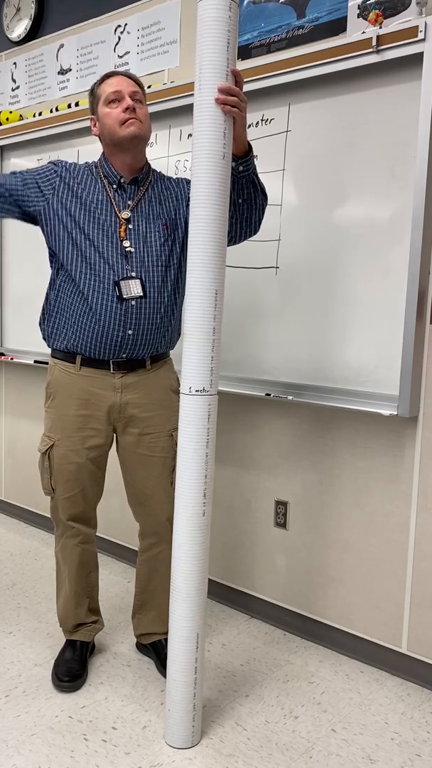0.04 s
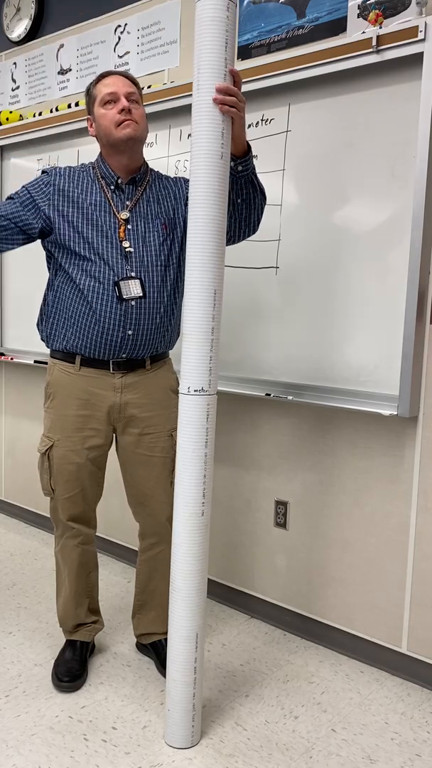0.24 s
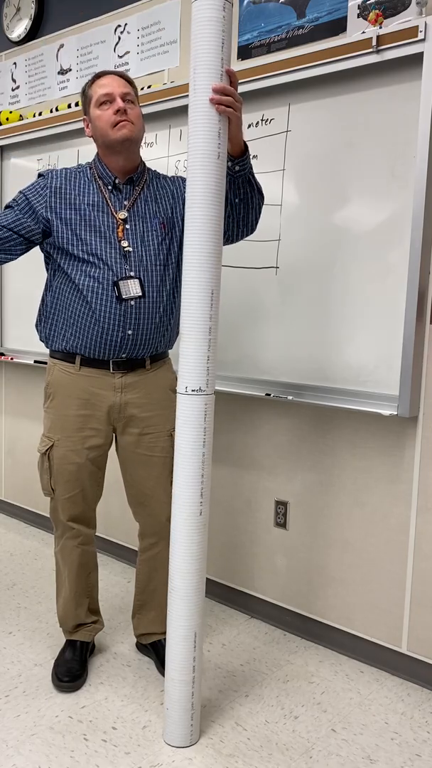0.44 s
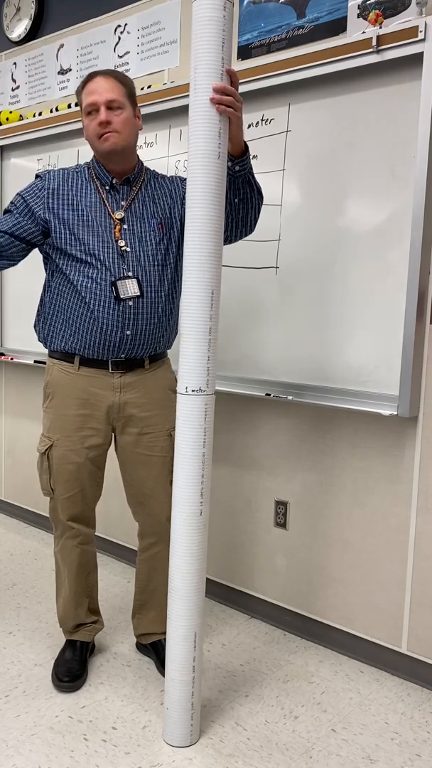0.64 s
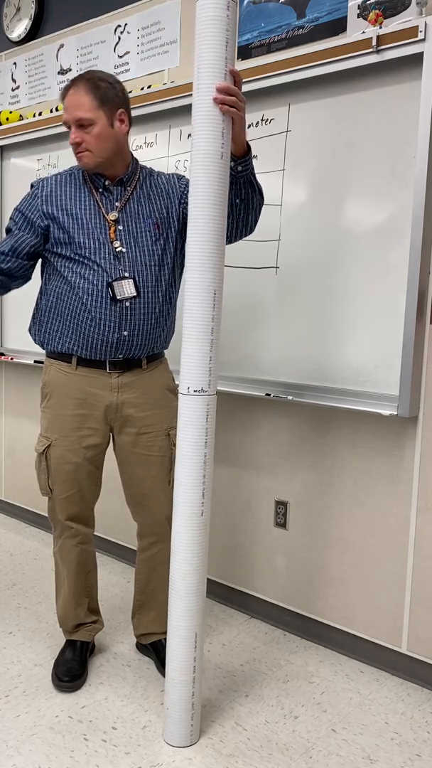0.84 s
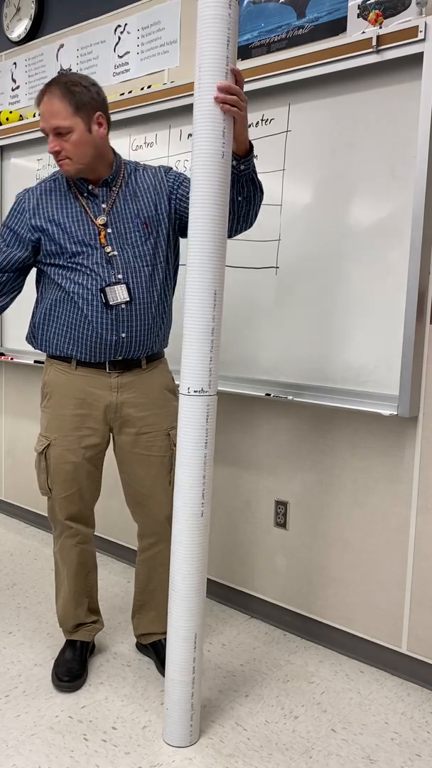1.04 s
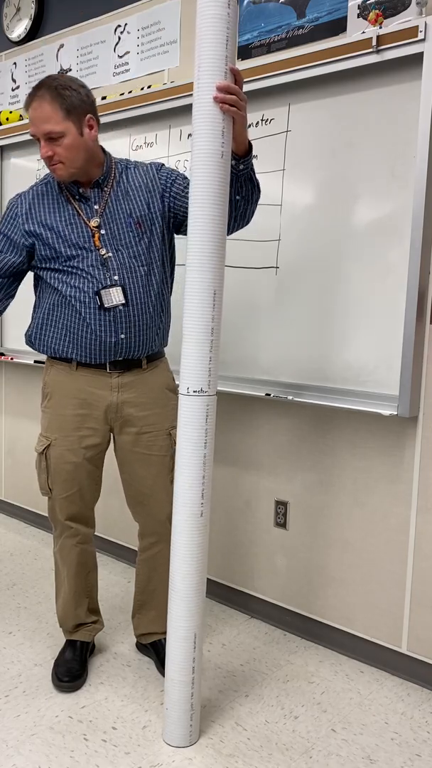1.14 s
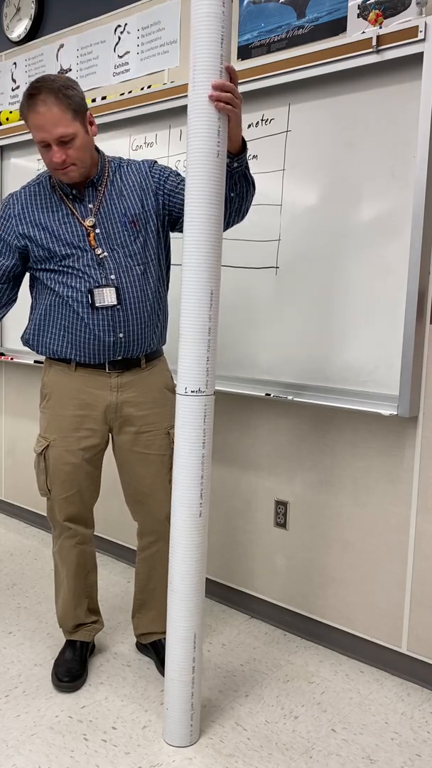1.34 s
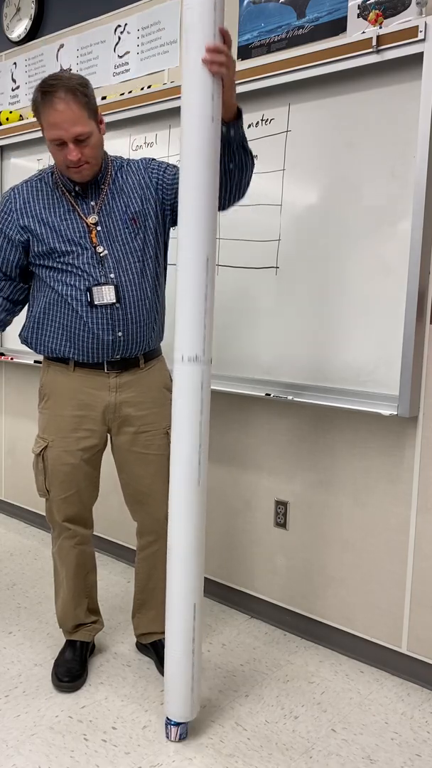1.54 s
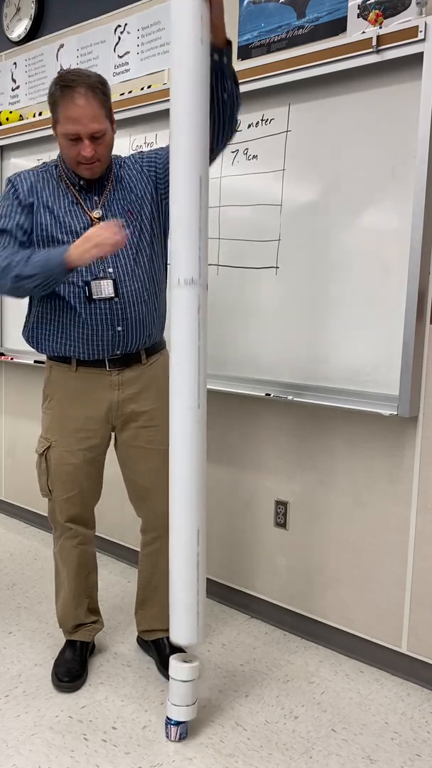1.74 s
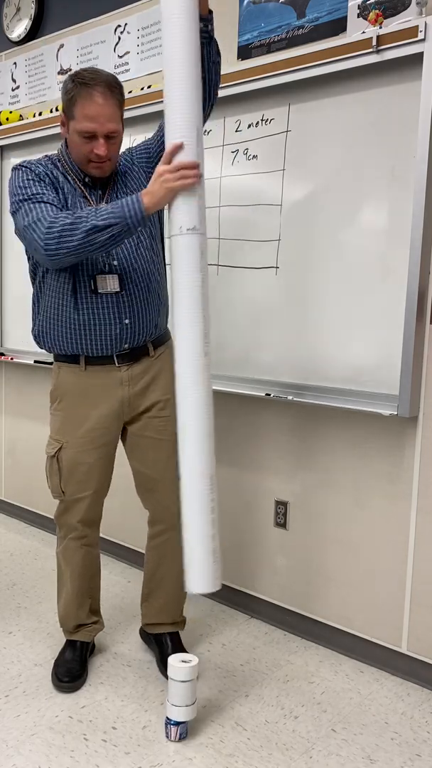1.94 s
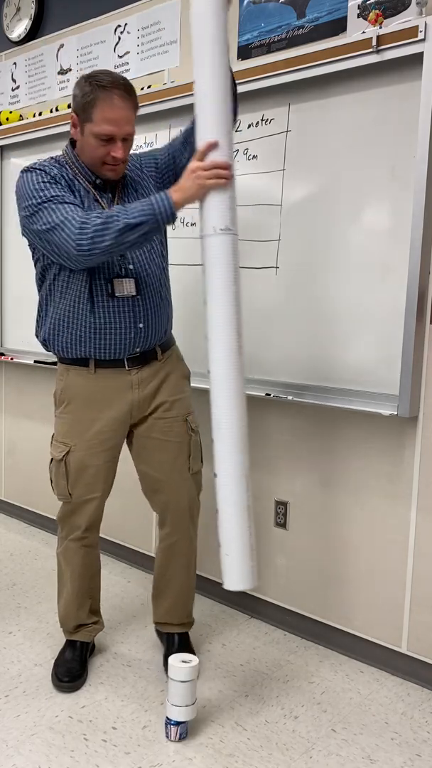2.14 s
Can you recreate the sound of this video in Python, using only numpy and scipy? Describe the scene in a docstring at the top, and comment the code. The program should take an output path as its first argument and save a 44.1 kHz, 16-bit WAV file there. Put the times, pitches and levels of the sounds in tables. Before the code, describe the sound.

A weight scrapes down a pipe and crushes a can, followed by clinks and soft knocks.

```python
"""A weight scrapes and bumps down an upright plastic pipe, exciting the wall's resonances. It slams onto
an aluminium can on a hard classroom floor: a crack, a crunch, a thud; a low room tail swells and fades.
Later a steel part clinks and rattles, the pipe is knocked and hums as it is lifted, and hands and
sleeves brush it. All along, ventilation hums in the lively room; a phone's two microphone ports hear it."""
import sys
import numpy as np
from scipy import signal
from scipy.fft import rfft, irfft, next_fast_len
from scipy.io import wavfile

SR = 44100
rng = np.random.default_rng(int(sys.argv[2]) if len(sys.argv) > 2 else 0)


def materialize(psi):
    """Save the field psi as 16-bit PCM at rate SR to the path in sys.argv[1].

    A 1-D psi becomes a single channel; in a 2-D psi each row is a channel.
    """
    bounded = np.clip(np.atleast_2d(psi).T, -1, 1)
    quanta = np.round(bounded * 32767).astype(np.int16)
    wavfile.write(sys.argv[1], SR, quanta)


N = 97020
T = np.arange(N) / SR


def sliding_weight():
    """Grains of contact drive two sets of pipe resonances; the scrape's tone shifts back and forth."""
    # The scrape. Each row: time in seconds, level in dB, blend from 0 (first set) to 1 (second set).
    slide = [(0, -54, 0.29), (.03, -56.5, 0.56), (.045, -43.5, 0), (.07, -44, 0.28), (.105, -56.5, 0.71),
             (.125, -40.5, 1), (.162, -61, 0.75), (.18, -33, 0), (.27, -33.5, 0.08), (.31, -33, 0.84),
             (.4, -31, 0.91), (.411, -19.5, 0.97), (.417, -69, 0.55)]
    # The weight bumping the wall. Each row: start in seconds, strength in dB.
    bump_hits = [(0.034, -37.5), (0.052, -39.5), (0.113, -33.5), (0.167, -29), (.2, -27.5), (0.23, -31.5),
                 (0.258, -30.5), (0.284, -31.5), (0.31, -32.5), (0.317, -20.5), (0.345, -29),
                 (0.364, -30.5), (0.374, -23)]
    # First set of wall resonances. Each row: pitch in Hz, width in Hz, relative level in dB.
    first_modes = [(377, 49, 0.5), (483, 76, -2.5), (825, 41, -11), (1301, 83, -11.5), (1615, 98, -10),
                   (2085, 62, -15), (2465, 40, -24), (3080, 100, -23.5)]
    # Second set of wall resonances. Each row: pitch in Hz, width in Hz, relative level in dB.
    second_modes = [(378, 240, -11), (588.5, 79, 4), (666, 99, 0), (1016, 84, 1), (1197, 68, 1.5),
                    (1990, 125, -4.5), (2210, 78, -19), (2946, 70, -11.5)]
    # The hiss of rubbing. Each row: frequency in Hz, relative level in dB.
    hiss_colour = [(100, -18.5), (400, -3.5), (1500, -6.5), (3000, -13.5), (3800, -16), (4400, -13.5),
                   (5200, -18), (8000, -28), (12000, -27.5), (15500, -29.5)]
    grains_per_s, grain_spread_db, rattle_db = 2500, 4, 4.5
    slide_db, blend = curves(slide)
    scrape = amp(slide_db + rattle_db * wobble(110))  # the contact catches and lets go
    bumps = sum(amp(db) * fading(start, 0.0004, t60=0.0063) for start, db in bump_hits)
    grains = (rng.random(N) < grains_per_s / SR) * rng.standard_normal(N)
    grains *= amp(grain_spread_db * rng.standard_normal(N))

    def pipe_wall(share, modes):
        def response(f):
            return sum((-1) ** k * amp(db) * 1j * f * width / (hz * hz - f * f + 1j * f * width)
                       for k, (hz, width, db) in enumerate(modes))
        force = np.sqrt(share) * (scrape + bumps) * grains
        return filtered(force, response) / np.std(filtered(grains, response))

    blend = np.clip(blend, 0, 1)
    hiss = amp(-3) * (scrape + .3 * bumps) * coloured(hiss_colour)
    return pipe_wall(1 - blend, first_modes) + pipe_wall(blend, second_modes) + hiss


def can_slam():
    """The can cracks and folds, pipe and floor take the blow, and a low room tail swells and fades."""
    # The can's crack. Each row: frequency in Hz, relative level in dB.
    crack_colour = [(100, -27), (1000, -4.5), (1700, 11), (3000, -8.5), (4500, 0), (8000, -6), (11500, -6),
                    (15500, -16)]
    # The can folding. Each row: frequency in Hz, relative level in dB.
    crunch_colour = [(150, -3.5), (500, -7.5), (900, 3.5), (1800, -7.5), (3000, -1.5), (4000, -15),
                     (8000, -10.5), (11500, -13), (15500, -16.5)]
    # The thud of pipe, can and floor. Each row: pitch in Hz, level in dB, t60 in seconds.
    thud_modes = [(77, -15, 0.04), (349.5, -8.5, 0.015), (349, -15.5, 0.064), (461, -17, 0.068),
                  (499, -10, 0.054), (584, -4.5, 0.043), (1065, -15.5, 0.052)]
    # The slam's low room tail, drawn to swell back as the phone's gain recovers, then fade.
    # Each row: time in seconds, level in dB.
    tail_swell = [(.54, -86), (.568, -36.5), (.62, -36), (.665, -34.5), (.72, -41), (.775, -45), (.8, -53),
                  (.9, -69.5)]
    # The room tail's tone. Each row: frequency in Hz, relative level in dB.
    tail_colour = [(40, -32.5), (130, -2.5), (310, 0), (580, 1.5), (800, -12), (1700, -22.5), (3000, -26),
                   (6000, -37), (15000, -89)]
    slam_s, thud_delay_s = .4172, 0.00247
    crack = amp(-5.5) * fading(slam_s, 0.00059, t60=0.015) * coloured(crack_colour)
    crunch = amp(-17.5 + 4.2 * wobble(300)) * fading(slam_s, 0.00052, t60=0.12) * coloured(crunch_colour)
    room_tail = amp(curves(tail_swell)[0] + 3.1 * wobble(60)) * coloured(tail_colour)
    return crack + crunch + room_tail + ring(slam_s + thud_delay_s, thud_modes, flutter=0)


def steel_clinks():
    """A steel part is struck and rattles, each hit a bright ring with a noisy edge."""
    # The hits. Each row: start in seconds, relative level in dB.
    hits = [(1.196, -24), (1.24, -40), (1.2625, -31.5), (1.3, -42.5), (1.324, -40.5), (1.372, -59.5),
            (1.43, -65)]
    # The steel's partials. Each row: pitch in Hz, relative level in dB, t60 in seconds.
    steel_modes = [(2210, -7.5, 0.14), (2540, -4, 0.084), (3176, -2, 0.16), (3240, -4.5, 0.36),
                   (3380, -2.5, 0.091), (4600, -11.5, 0.19), (4933, -2.5, 0.14), (5006, 5, 0.082),
                   (5540, -10.5, 0.077), (5840, -8, 0.14), (7120, -7, 0.13), (9250, -12.5, 0.16),
                   (11570, -14, 0.085), (14150, -19, .04)]
    # The edge of a hit. Each row: frequency in Hz, relative level in dB.
    edge_colour = [(500, -10), (2500, -3.5), (3900, -2), (5500, -1), (10000, -14), (15000, -54)]
    out = np.zeros(N)
    for start, db in hits:
        tone = ring(start, steel_modes, flutter=1.6)
        edge = amp(6) * fading(start, 0.00099, t60=0.034) * coloured(edge_colour)
        out += amp(db - 6.5) * (tone + edge)
    return out


def pipe_hums():
    """Soft knocks set the pipe humming, each a low tone with a weaker ring that is held longer."""
    # The knocks. Each row: start in seconds, pitch in Hz, level in dB, hold and t60 in seconds.
    knocks = [(-.01, 351.5, -39, 0.0099, 0.34), (0.119, 347, -34.5, 0.021, 0.089),
              (0.116, 618, -34.5, 0.01, 0.079), (0.122, 997, -47, 0.013, 0.05),
              (.198, 362.7, -22, 0.012, 0.027), (.216, 360, -21, 0.0042, 0.036),
              (.228, 366, -29, 0.0076, .04), (.3445, 655, -17.5, 0.0029, 0.012),
              (.354, 600, -20, 0.0011, 0.02), (1.201, 260.5, -37.5, 0.0087, 0.027),
              (1.237, 167, -38, 0.017, 0.089), (1.295, 168.6, -41, 0.0088, 0.14),
              (1.494, 432.7, -39.5, 0.02, 0.1), (1.51, 188.7, -52.5, 0.09, 0.24),
              (1.53, 135.4, -50, 0.086, .2), (1.632, 357, -41, 0.008, 0.13),
              (1.964, 330.7, -49, 0.019, .15), (1.71, 149, -47, 0.018, 0.056),
              (1.737, 356, -32.5, 0.038, 0.086)]
    attack_s = 0.0015
    out = np.zeros(N)
    for start, hz, db, hold, t60 in knocks:
        body = fading(start, attack_s, t60, hold)
        tail = amp(-11) * fading(start, attack_s, t60=4 * hold, hold_s=3.3 * hold)
        out += amp(db) * np.maximum(body, tail) * np.sin(2 * np.pi * hz * (T - start))
    return out


def pipe_brushes():
    """Rubs and taps on the pipe, each a burst of grainy noise with its own colour."""
    # The touches. Each row: start in seconds, level in dB, attack and t60 in seconds,
    # corner frequency in Hz, slopes below and above the corner in dB per octave.
    touches = [(0.279, -35.5, 0.0026, 0.17, 2620, 8, -5), (0.31, -27.5, 0.0054, 0.16, 4930, 3, -30),
               (.4095, -22, .0015, 0.024, 2300, 7.5, -11), (0.559, -34.5, 0.0014, 0.38, 1610, 0.5, -9.5),
               (1.2, -45.5, 0.0047, 0.57, 1470, 2.5, -9.5), (1.298, -44.5, 0.011, 0.31, 1500, -0.5, -16),
               (1.33, -56, 0.023, 3.3, 343, 5, -36), (1.485, -50.5, 0.00383, 0.4, 1520, -0.5, -9),
               (1.574, -45.5, 0.027, 0.71, 696, 2, -9.5), (1.635, -45, 0.0011, 0.14, 4430, -4, -14),
               (1.707, -46.5, 0.003, 0.2, 3270, 2, -10), (1.769, -35, 0.00029, 0.036, 7100, 0, 0.5),
               (1.778, -59.5, 0.0034, 0.86, 3770, -5.5, -4), (1.943, -46.5, 0.025, 0.58, 4700, 2, -6),
               (2.1, -55.5, 0.057, 0.98, 4860, 2, -4.5)]
    out = np.zeros(N)
    for start, db, attack, t60, hz, rise, fall in touches:
        bass_db, treble_db = -rise * np.log2(hz / 150), fall * np.log2(16000 / hz)
        colour = [(30, -60), (150, bass_db), (hz, 0), (16000, treble_db)]
        out += amp(db + 1.44 * wobble(270)) * fading(start, attack, t60) * coloured(colour)
    return out


def room(x):
    """The classroom's reverb of x: each frequency dies away at its own speed."""
    # The decay. Each row: frequency in Hz, t60 in seconds.
    decay_times = [(60, 0.2), (250, 0.61), (600, 0.5), (2000, 0.41), (5000, 0.36), (10000, 0.2),
                   (15000, 0.26)]
    predelay_s = .004
    hz, t, noise = signal.stft(rng.standard_normal((2, SR)), SR, nperseg=256)
    decay = amp(-60 * t / along(decay_times, hz)[:, None])
    tail = diffuse(signal.istft(noise * decay, SR, nperseg=256)[1])
    delayed = np.pad(x, (round(predelay_s * SR), 0))
    return signal.fftconvolve(delayed[None], tail / np.linalg.norm(tail[0]), axes=1)[:, :N]


def ventilation():
    """Moving air lays a steady, low bed of noise from all sides."""
    # The air's tone. Each row: frequency in Hz, relative level in dB.
    air_colour = [(15, -39.5), (25, 0.5), (198, -0.5), (239, -8.5), (398, -1), (578, -20.5), (635, -13.5),
                  (2280, -31.5), (2450, -24.5), (4800, -37.5), (6800, -62), (10000, -67.5), (14300, -84)]
    return amp(-55.5) * diffuse(np.array([coloured(air_colour), coloured(air_colour)]))


def diffuse(pair):
    """Blends two unrelated signals until they are as alike as diffuse sound at the two ports."""
    # The stereo image. Each row: frequency in Hz, left-right likeness (1 is mono).
    likeness = [(60, 0.99), (200, 1), (500, 0.15), (1000, 0.057), (3000, 0.161), (5000, .7), (8000, 0.97),
                (16000, 0.6)]

    def mid_side_gains(hz):
        angle = np.arccos(np.clip(along(likeness, hz), -1, 1)) / 2
        return np.array([np.cos(angle), np.sin(angle)])

    mid, side = filtered(pair, mid_side_gains)
    return np.array([mid + side, mid - side])


def ring(start_s, modes, flutter):
    """Struck modes dying away; flutter blurs each one in level and phase."""
    first, flutter_share = round(start_s * SR), .04  # flutter rate as a share of pitch
    out, span = np.zeros(N), slice(first, first + SR // 2)
    t = T[span] - start_s
    for hz, db, t60 in modes:
        phase = 2 * np.pi * hz * t
        sine = (1 + flutter * wobble(flutter_share * hz, t)) * np.sin(phase)
        cosine = flutter * wobble(flutter_share * hz, t) * np.cos(phase)
        out[span] += amp(db - 60 * t / t60) * (sine + cosine)
    out[span] *= 1 - np.exp(-np.abs(t) / 0.00037)  # attack
    return out / np.hypot(1, flutter)


def fading(start_s, attack_s, t60, hold_s=0):
    """An envelope: attack, hold, then a fall of 60 dB every t60 seconds."""
    t = np.maximum(T - start_s, 0)
    return (1 - np.exp(-t / max(attack_s, 1e-4))) * amp(-60 * np.maximum(t - hold_s, 0) / t60)


def wobble(hz, t=T):
    """A random curve through hz knots a second."""
    knots = rng.standard_normal(4096)
    return np.interp(np.abs(t) * hz, np.arange(len(knots)), knots)


def coloured(spectrum):
    """Noise of rms 1, shaped by (Hz, dB) points."""
    noise = filtered(rng.standard_normal(N), lambda hz: amp(along(spectrum, hz)))
    return noise / np.sqrt(np.mean(noise ** 2) + 1e-20)


def filtered(x, response):
    """Passes x through a complex frequency response."""
    size = next_fast_len(x.shape[-1] + SR // 2)
    return irfft(rfft(x, size) * response(np.fft.rfftfreq(size, 1 / SR)), size)[..., :x.shape[-1]]


def curves(rows):
    """One value per sample for each column after the time."""
    times, *columns = np.transpose(rows)
    return [np.interp(T, times, column) for column in columns]


def along(points, hz):
    """Reads (Hz, value) points on a log frequency axis."""
    freqs, values = np.transpose(points)
    return np.interp(np.log(hz + 1), np.log(freqs + 1), values)


def amp(db):
    return 10 ** (np.asarray(db) / 20)


def scene():
    """All sources in the room, with less reverb on the pipe's hums."""
    layers = [sliding_weight() + steel_clinks(), can_slam(), pipe_brushes()]
    hums = pipe_hums()
    reverb = amp(-6) * sum(room(layer) for layer in layers) + amp(-15) * room(hums)
    return sum(layers) + hums + reverb + ventilation()


def record(dry):
    """The phone rounds off peaks and cuts deep bass and top treble; its ports differ in level and phase."""
    # Phase between the ports. Each row: frequency in Hz, lead of the left in radians.
    port_lead = [(0, 0), (2000, 1.01), (5200, 1.0447), (7400, 3), (10300, 6.5), (13600, 9), (16000, 12)]
    # Balance of the ports. Each row: frequency in Hz, left over right in dB.
    port_tilt = [(60, 0), (600, -1.5), (2500, -0.3), (10000, -0.5)]
    ceiling, knee, bass_cut_hz, top_hz = .95, 4, 29.4, 15750
    sides = np.array([[.5], [-.5]])

    def ports(hz):
        balance = amp(sides * along(port_tilt, hz))
        lead = np.exp(1j * sides * np.interp(hz, *np.transpose(port_lead)))
        bass_cut = (1j * hz / (bass_cut_hz + 1j * hz)) ** 2
        treble_cut = np.clip((top_hz - hz) / 200 + .5, 0, 1) ** 2
        return balance * lead * bass_cut * treble_cut

    saturated = dry / (1 + np.abs(dry / ceiling) ** knee) ** (1 / knee)
    return filtered(saturated, ports)


dry = scene()
out = record(dry)
materialize(out)
```